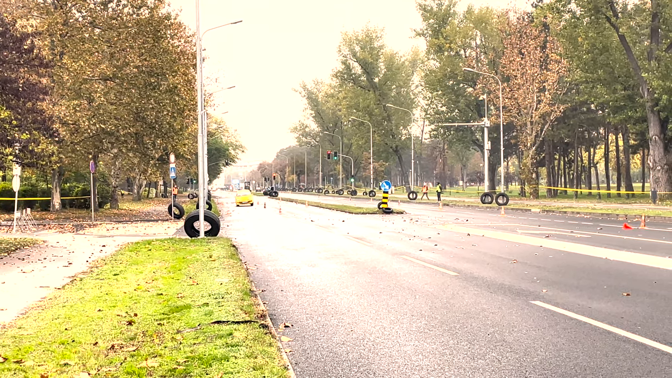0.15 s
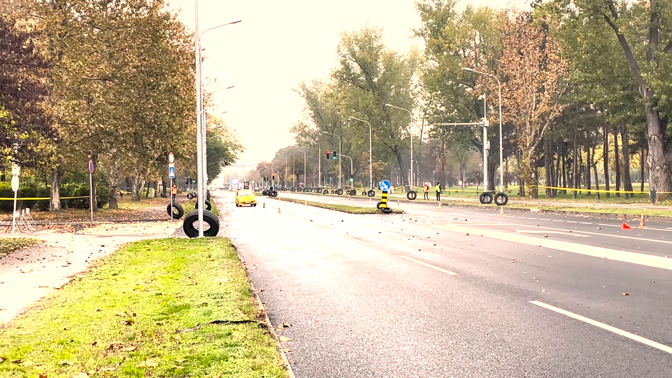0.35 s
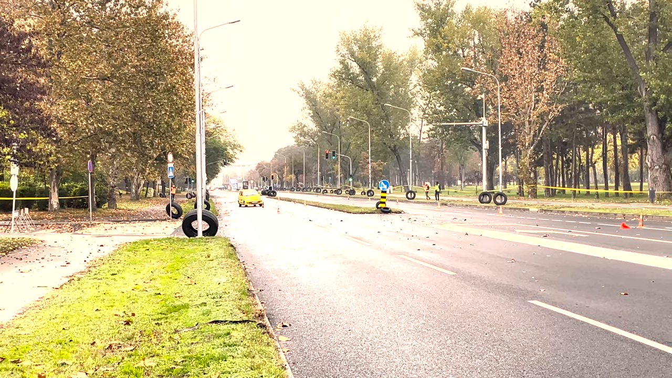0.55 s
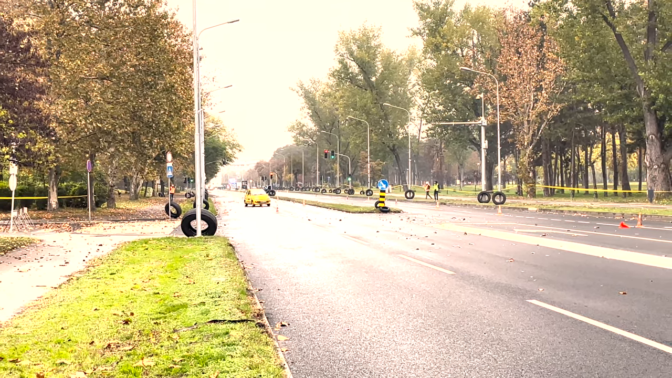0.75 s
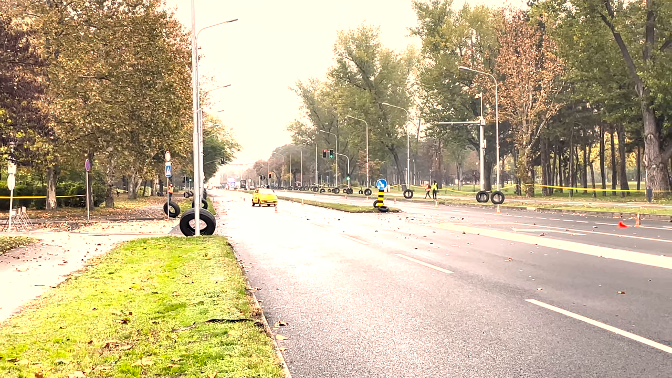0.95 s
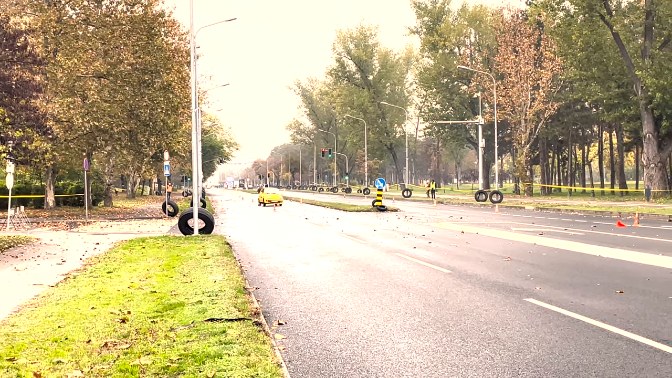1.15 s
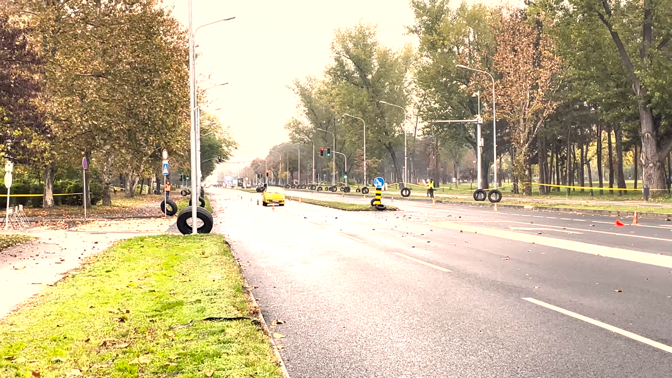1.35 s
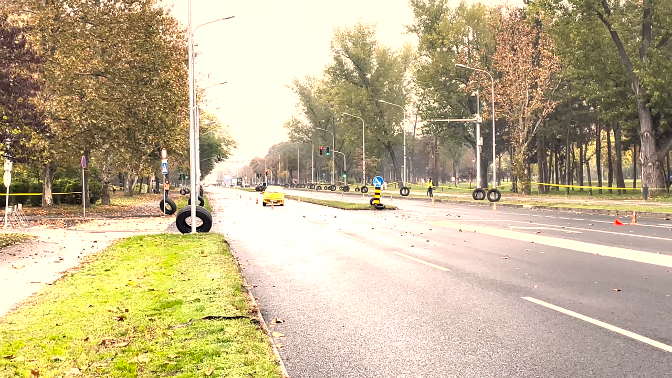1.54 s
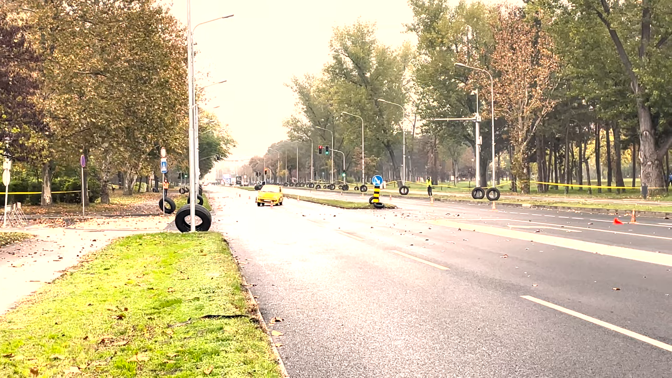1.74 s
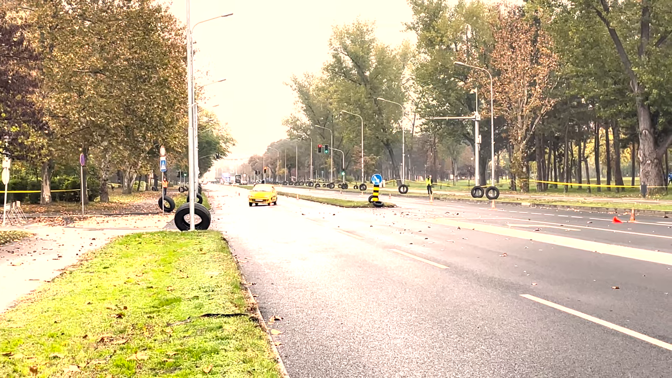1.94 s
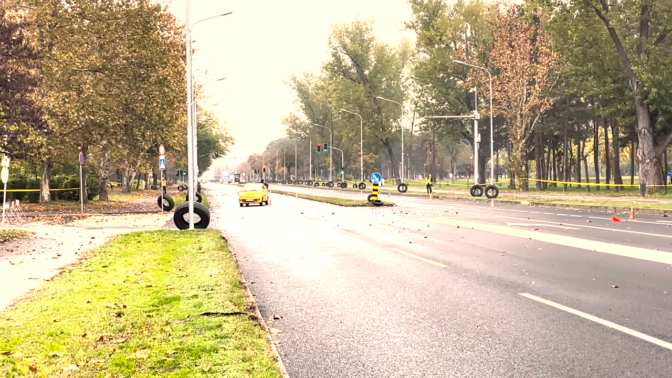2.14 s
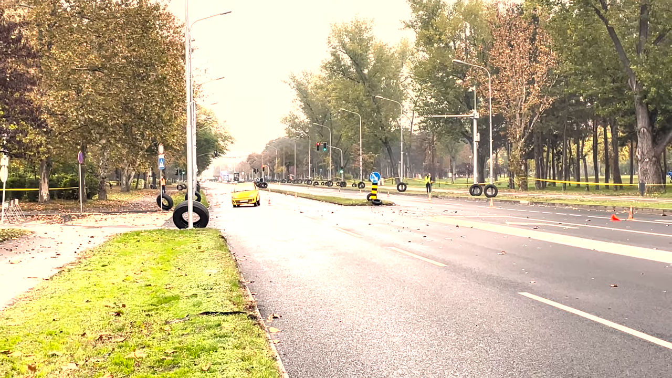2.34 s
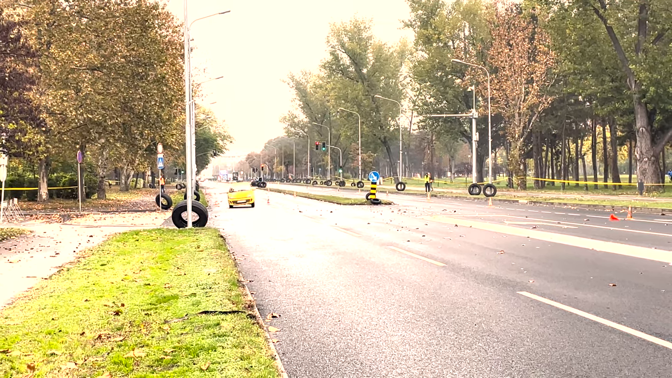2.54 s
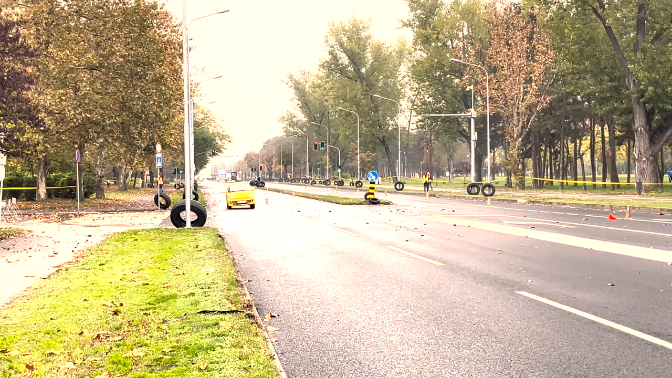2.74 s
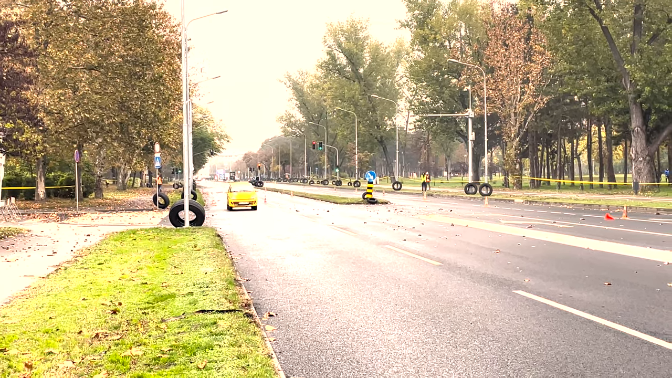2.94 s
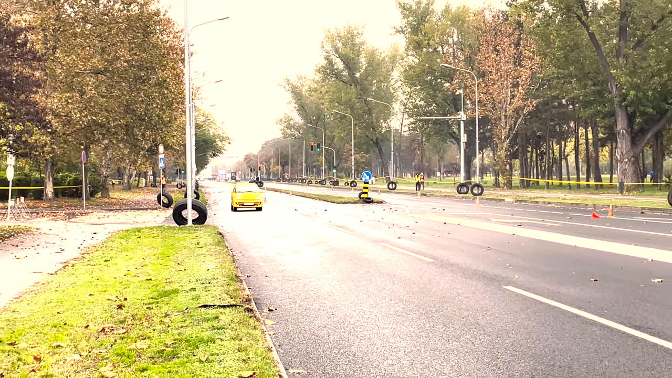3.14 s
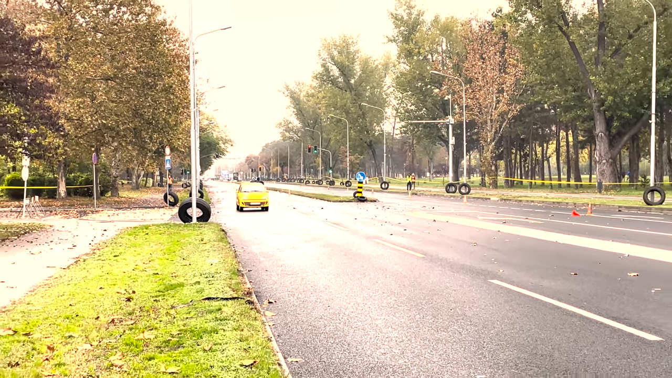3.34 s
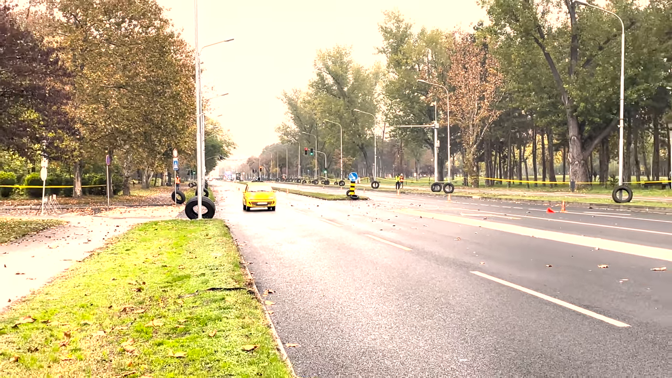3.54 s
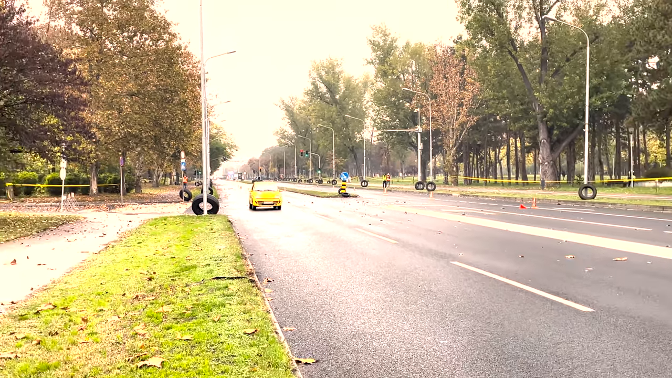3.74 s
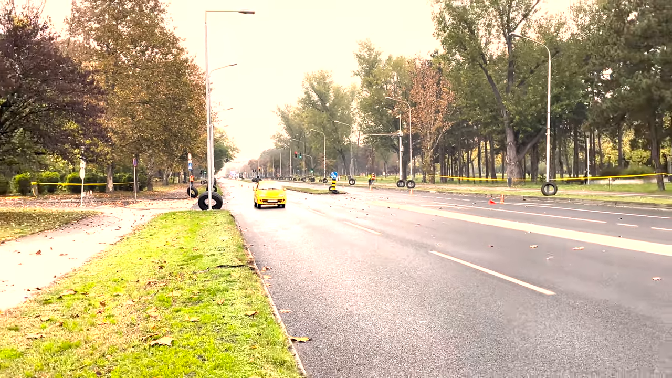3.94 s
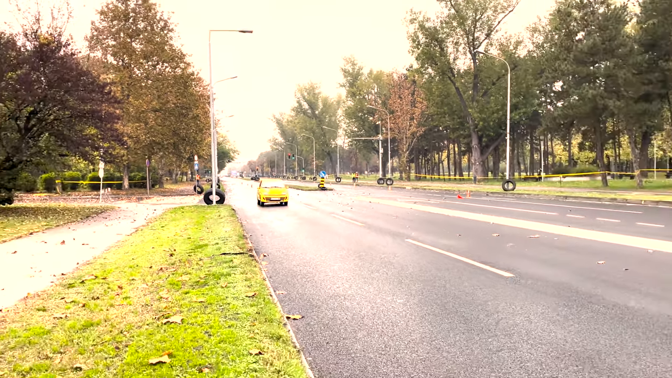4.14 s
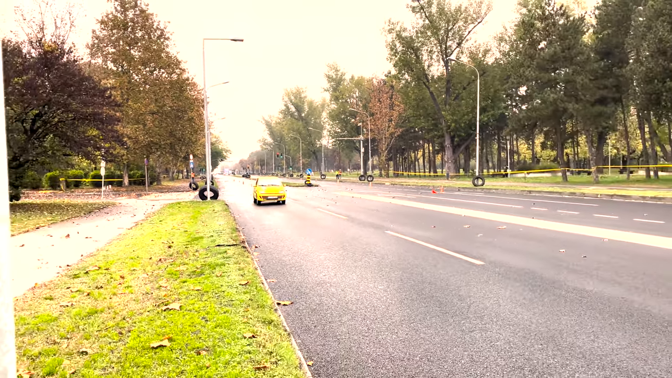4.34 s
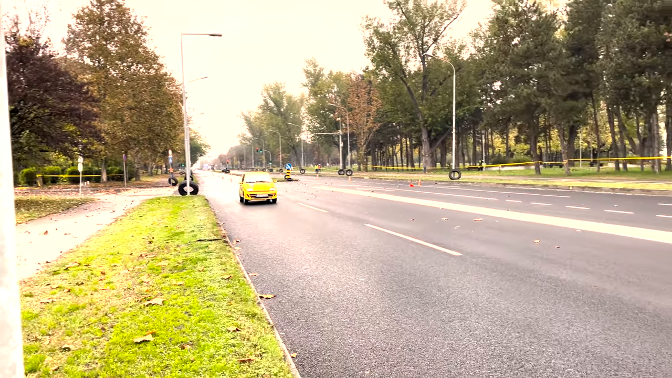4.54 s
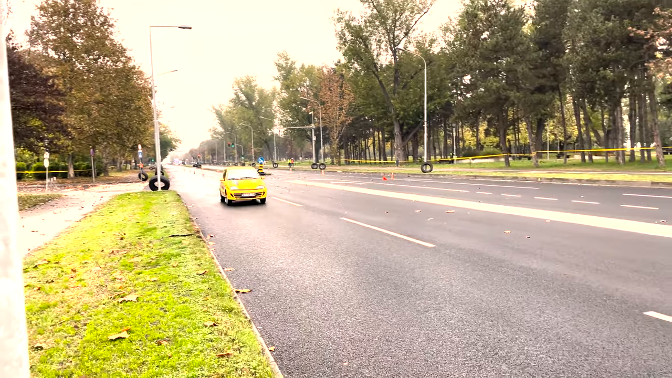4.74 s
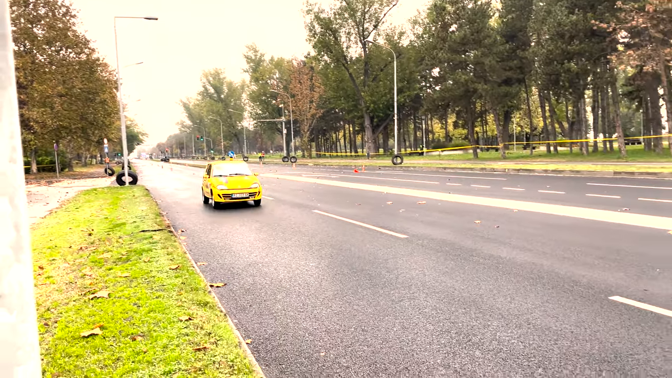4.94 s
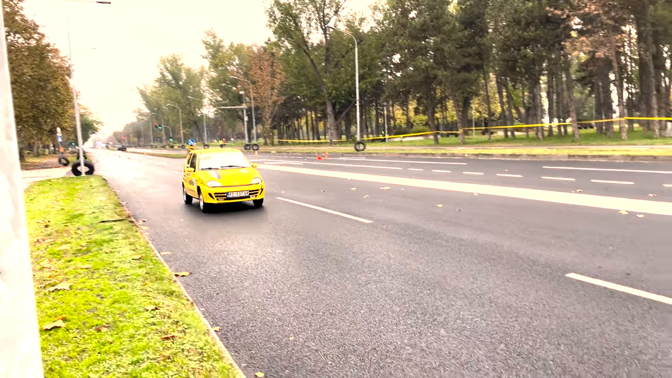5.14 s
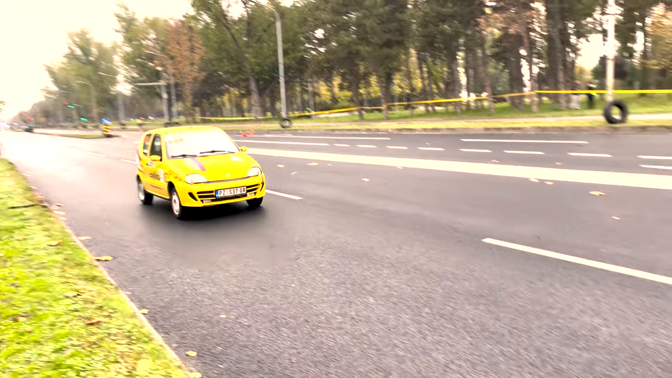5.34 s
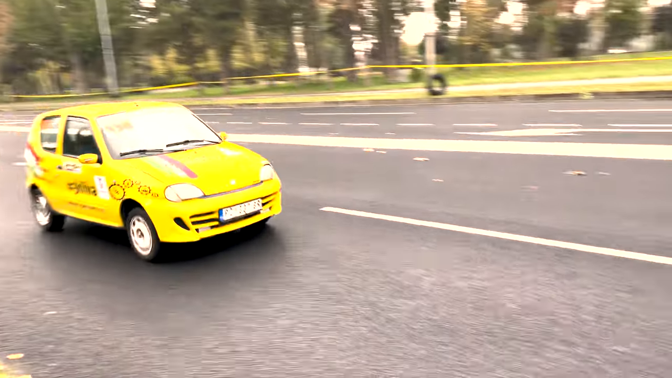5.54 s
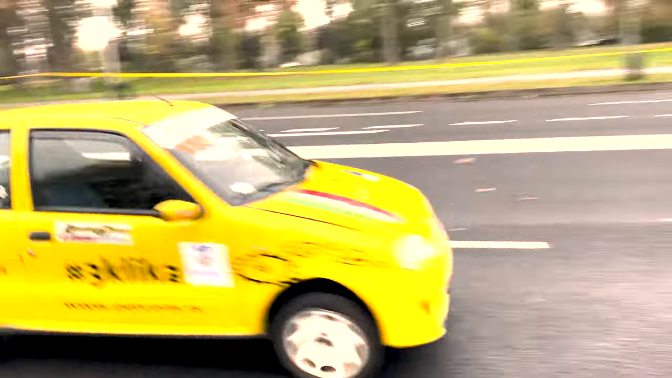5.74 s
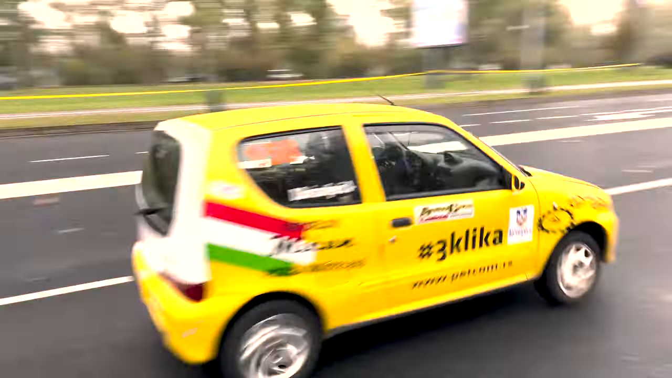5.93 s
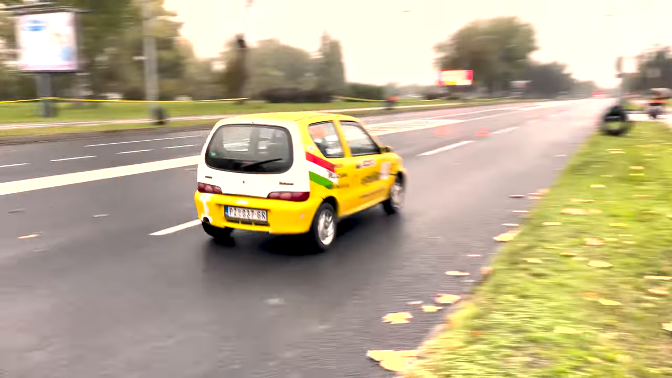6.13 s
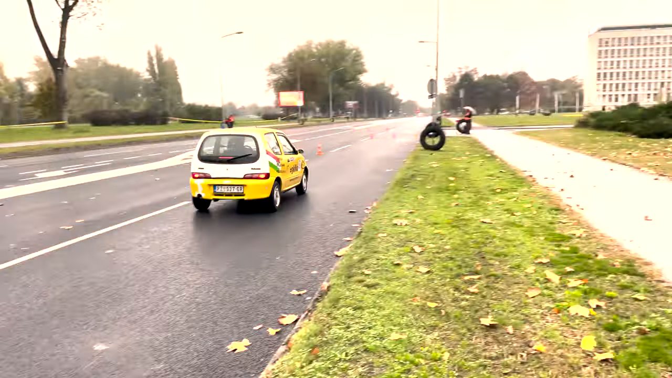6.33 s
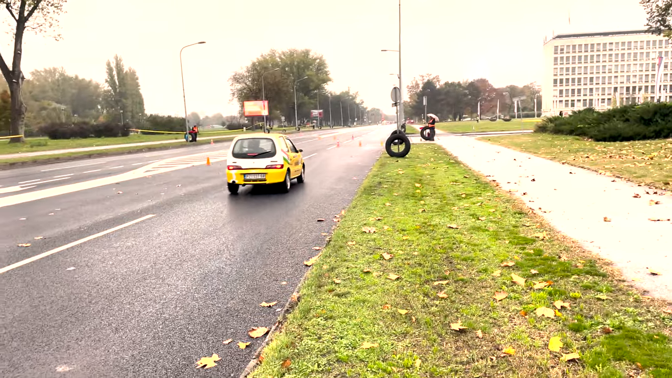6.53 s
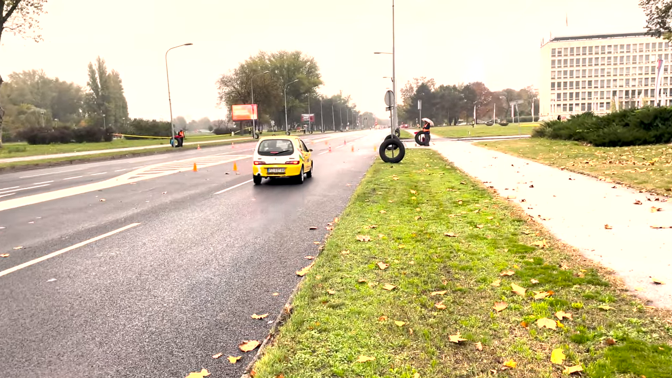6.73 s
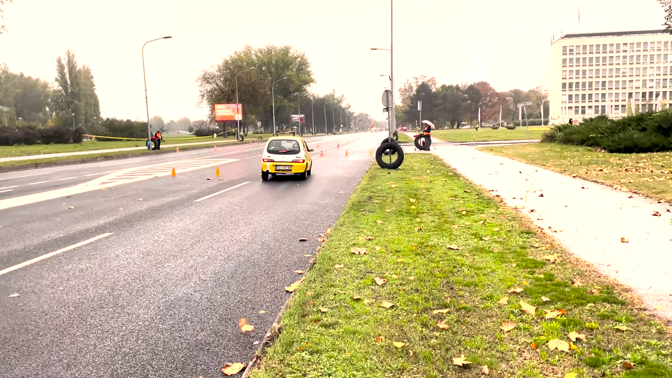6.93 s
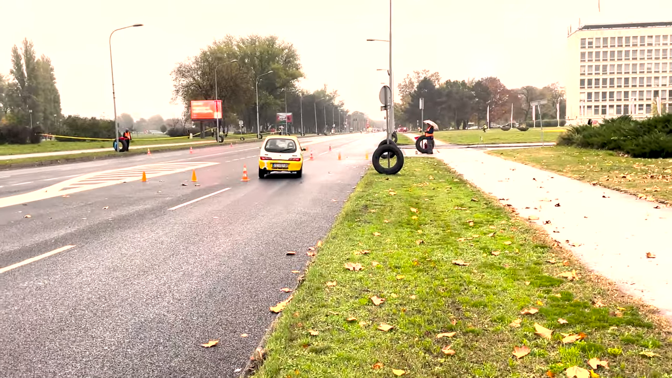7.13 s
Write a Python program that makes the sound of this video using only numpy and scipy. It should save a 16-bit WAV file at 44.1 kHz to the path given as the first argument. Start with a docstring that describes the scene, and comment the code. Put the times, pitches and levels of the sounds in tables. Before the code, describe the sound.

A roadside stereo microphone on a wet avenue, with light wind rumble and soft low bumps, strongest around 2.4 and 3 s. At 0 s a distant tyre squeal around 1.4 kHz is already sounding and breaks off within about 0.2 s. A faint small four-cylinder engine and wet road hiss continue. From 1.4 to 2 s a softer, sagging squeal near 1.1 kHz returns, and a thin drivetrain whine wanders until 3.5 s. From 2.4 s the engine revs climb steadily, buzzy and raspy, as hiss and roar swell, steeply after 5 s. At 5.7 s the car passes about four metres away: loud broadband wet rush, gritty swishes, crackling droplets. Near 6 s the throttle shuts with a soft chuff and the pitch drops; a short blip peaks around 6.2 s, another chuff follows at 6.3 s, then revs fall and fade to 7 s, with one tick at 6.5 s and faint tree reverberation.

```python
"""A wet avenue lined with trees: a small four-cylinder rally car squeals in a distant slalom, then revs up to the roadside.
It passes a few metres away in a hiss of spray, lifts off, blips the throttle once and coasts away.
The engine is a sum of crank orders with pulsed noise; road and water are modulated, filtered noise; skids are sagging tones.
Levels follow the distance and bearing of a straight drive past. Trees answer diffusely, a nearby surface adds one
short echo, the road ticks and crackles, and light wind bumps the microphone."""
import sys
import numpy as np
from scipy import signal
from scipy.fft import rfft, irfft, next_fast_len
from scipy.io import wavfile
from scipy.ndimage import map_coordinates

SR = 44100
rng = np.random.default_rng(int(sys.argv[2]) if len(sys.argv) > 2 else 0)


def wav_record(signal):
    """Record a signal, one row per channel, as 16-bit PCM in the file named by sys.argv[1]."""
    frames = np.transpose(np.atleast_2d(signal))
    bounded = np.clip(frames, -1, 1)
    # unit amplitude maps onto the largest positive 16-bit level
    quanta = np.round(bounded * 32767).astype(np.int16)
    wavfile.write(sys.argv[1], SR, quanta)


N = 316638  # samples
TIME_S = np.arange(N) / SR


def amp(db):
    """Decibel law: a level as a pressure gain."""
    return 10 ** (np.asarray(db) / 20)


def unit(x):
    """Normalisation: scale to rms 1."""
    return x / np.sqrt(np.mean(x ** 2) + 1e-20)


def along(points, hz):
    """Interpolation on a logarithmic frequency axis, for each column after the frequency."""
    knots_hz, *columns = np.transpose(points)
    return [np.interp(np.log(hz + 1), np.log(knots_hz + 1), column) for column in columns]


def curves(rows):
    """Linear interpolation in time: one value per sample for each column after the time."""
    knots_s, *columns = np.transpose(rows)
    return [np.interp(TIME_S, knots_s, column) for column in columns]


def wobble(rate):
    """Band-limited randomness: a smooth random curve of rms 1, with rate knots a second."""
    knots = rng.standard_normal(int(N * rate / SR) + 4)
    return unit(map_coordinates(knots, [np.arange(N) * rate / SR]))


def swell(s, half_length):
    """Gaussian envelope: a bell of height 1 around a moment."""
    return np.exp(-((TIME_S - s) / half_length) ** 2)


def swells(rows):
    """Superposition of envelopes: the summed gain of several (time [s], half-length [s], level [dB]) bells."""
    return sum(amp(db) * swell(s, half_length) for s, half_length, db in rows)


def step(s, length):
    """Linear transition: a ramp from 0 to 1 centred on a moment."""
    return np.clip((TIME_S - s) / length + 0.5, 0, 1)


def filtered(x, response):
    """Linear filtering: multiply the spectrum by a complex response of frequency."""
    size = next_fast_len(N + SR // 4)
    return irfft(rfft(x, size) * response(np.fft.rfftfreq(size, 1 / SR)), size)[..., :N]


def coloured(x, spectrum):
    """Spectral shaping: x filtered by a (frequency [Hz], level [dB]) curve, at rms 1."""
    return unit(filtered(x, lambda hz: amp(along(spectrum, hz)[0])))


def noise(scatter):
    """Partial coherence: white noise with a shared part and a part opposed between the ports."""
    direct, stray = rng.standard_normal((2, N))
    return np.array([direct + scatter * stray, direct - scatter * stray]) / np.sqrt(1 + scatter ** 2)


def partial(turns, unsteady, rate):
    """Modulated sinusoid: a random starting phase, with flutter in strength and phase."""
    phase = 2 * np.pi * (turns + rng.random()) + unsteady * wobble(rate)
    return np.sqrt(2) * (1 + unsteady * wobble(rate)) * np.sin(phase)


# steady wind on the microphone: (time [s], level [dB])
BREEZE_LEVEL = [(0, -41.5), (2.2, -38.5), (4.1, -38.5), (4.95, -36.5), (5.5, -45), (6.4, -42), (7.0, -48)]
# wind bumps: (start [s], peak of the envelope [dB])
WIND_BUMPS = [(0.025, -33), (0.275, -36), (0.703, -30), (0.857, -28.5), (1.029, -26), (1.409, -32),
              (2.35, -22.5), (2.529, -34), (2.609, -29), (3.039, -21.5), (3.268, -28), (3.85, -32),
              (4.899, -24.5), (5.976, -28)]
# colour of the wind rumble: (frequency [Hz], relative level [dB])
WIND_SPECTRUM = [(20, -42), (40, -14.5), (58, 1.5), (85, -8), (130, -9), (250, -16.5), (600, -25.5),
                 (2000, -56), (8000, -100)]


def wind():
    """Turbulent pressure: lumpy low rumble, stronger on the left, and gusts as short damped oscillations."""
    rumble = coloured(noise(scatter=0.55), WIND_SPECTRUM) * amp(1.8 * wobble(10))
    air = amp(curves(BREEZE_LEVEL)[0]) * rumble
    for start, db in WIND_BUMPS:
        age = np.maximum(TIME_S - start, 0)
        push = age / 0.017  # the envelope peaks after 17 ms
        bump_hz = 60 * amp(rng.normal(0, 1))
        air = air + amp(db) * push * np.exp(1 - push) * np.sin(2 * np.pi * bump_hz * age)
    return air * amp([[0.5], [-0.5]])


# decay of the avenue's answer: (frequency [Hz], time to fall 60 dB [s])
TREE_DECAY = [(150, 0.97), (1200, 0.58), (8000, 1)]


def trees(x):
    """Diffuse reverberation: convolution with decaying noise, alike in the two channels only in the bass."""
    hz, t, z = signal.stft(rng.standard_normal((2, SR)), SR, nperseg=256)
    decay = amp(-60 * t / along(TREE_DECAY, hz)[0][:, None])
    answer = np.array(signal.istft(z * decay, SR, nperseg=256)[1])
    # the norm of the middle and side responses together is scaled to 1
    answer = answer / np.linalg.norm(answer)
    mid, side = signal.fftconvolve(x.mean(axis=0)[None], answer, axes=1)[:, :N]
    side = filtered(side, lambda hz: hz / np.hypot(hz, 700))
    return np.array([mid + side, mid - side]) / np.sqrt(2)


# short ticks and splash crackles from the road:
# (time [s], level before a 12 dB cut [dB], time to fall 60 dB [s], snap against ring [dB])
ROAD_TICKS = [(0.92, -53, 0.22, -18), (3.6794, -43, 0.08, -5), (5.634, -20, 0.066, 8),
              (5.732, -22, 0.07, 10), (6.536, -20.5, 0.041, 1), (7.0209, -48, 0.1, 0)]


def ticks():
    """Impulse and exponential decay: ticks and splash crackles from the road mix a ring with a bright snap."""
    ring_spectrum = [(3000, -30), (6000, -14), (6800, 1), (8000, -12), (10000, -30), (15000, -50)]
    ring = coloured(noise(scatter=0.3), ring_spectrum)
    snap = coloured(noise(scatter=0.3), [(3000, -30), (7000, 2), (13000, -8), (15000, -12)])
    out = np.zeros((2, N))
    for start, db, t60, snap_db in ROAD_TICKS:
        envelope = amp(db - 12 - 60 * np.abs(TIME_S - start) / t60) * (TIME_S >= start)
        out += envelope * unit(ring + amp(snap_db) * snap)
    return out


# tyres sliding in the slalom: (start [s], attack [s], time until release [s], release time constant [s],
# starting pitch [Hz], level [dB], overtones [dB], scrub against tone [dB], pitch roughness [0-1])
SKID_EVENTS = [(0.0, 0.0015, 0.032, 0.004, 1374, -27, -6.5, -9, 0.07),
               (0.036, 0.0027, 0.0099, 0.0067, 1280, -33.5, -2, -7, 0.1),
               (0.061, 0.015, 0.023, 0.0095, 1425, -35.5, -5, -2, 0.12),
               (0.045, 0.01, 0.1, 0.092, 1250, -45.5, -20, -6, 0.09),
               (1.397, 0.019, 0.15, 0.047, 1158, -39.5, -11, -5.5, 0.12),
               (1.449, 0.16, 0.28, 0.055, 1100, -35, -21, -7, 0.09),
               (1.58, 0.11, 0.25, 0.094, 1030, -38, -14, -6, 0.09)]
# broad noise of sliding rubber: (frequency [Hz], relative level [dB])
SCRUB_SPECTRUM = [(500, -19), (900, -2), (1400, 2.5), (2200, -3.5), (2800, -10), (4200, -20.5), (6000, -38),
                  (12000, -71)]
SKID_SAG_HZ_PER_S = 70


def squeal():
    """Stick-slip friction: each tread sounds an unsteady, sagging pitch over the scrub of sliding rubber."""
    out = np.zeros((2, N))
    scrub = coloured(noise(scatter=0.098), SCRUB_SPECTRUM)
    chatter = unit(amp(1.2 * wobble(150) + 1.3 * wobble(50)))
    for start, attack, length, release, start_hz, db, overtone_db, scrub_db, rough in SKID_EVENTS:
        age = np.maximum(TIME_S - start, 0)
        envelope = np.minimum(age / attack, 1) * np.exp(-np.maximum(age - length, 0) / release)
        pitch_hz = start_hz - SKID_SAG_HZ_PER_S * np.minimum(age, 2 * length)
        phase = 2 * np.pi * np.cumsum(pitch_hz * (1 + rough * wobble(650))) / SR
        tone = np.sin(phase) + amp(overtone_db) * np.sin(2 * phase)
        tone += 0.5 * amp(2 * overtone_db) * np.sin(3 * phase)
        out += amp(db) * envelope * unit(unit(tone) + amp(scrub_db) * scrub)
    return out * chatter


# horn resonance of the tyres: (time [s], centre frequency [Hz])
HORN_PITCH = [(4.1, 2258), (5.45, 2370), (5.62, 2202), (5.76, 2560), (6.15, 2360), (6.42, 1838),
              (7.15, 1742)]
# the horn faces the microphone: (time [s], half-length [s], extra level [dB])
HORN_FLARE = (5.73, 0.17, 11.6)


def howl(db, scatter):
    """Horn resonance: the wedge of tread and road sounds a narrow band that shifts with the angle to the wheels."""
    centre_hz, = curves(HORN_PITCH)
    flare_s, half_length, flare_db = HORN_FLARE
    flare = swell(flare_s, half_length)
    band = coloured(noise(scatter), [(20, 2.0), (110, 6.0), (190, -23), (320, -36), (1000, -80.5)])
    # abreast, several wheels sound at once and the band widens
    width = 0.028 + 0.05 * flare
    pitch_hz = centre_hz * (1 + width * wobble(300) + 0.012 * wobble(18))
    # the low-frequency noise is moved up to the centre frequency
    horn = unit(band * np.cos(2 * np.pi * np.cumsum(pitch_hz) / SR))
    return amp(db + flare_db * flare) * horn


# swishes from the wheels as they go past and just after: (time [s], half-length [s], level [dB])
WHEEL_SWISHES = [(5.645, 0.038, -22), (5.74, 0.032, -20), (6.13, 0.044, -39)]
# colour of the swish: (frequency [Hz], relative level [dB])
SWISH_SPECTRUM = [(700, -35), (1700, -22), (2200, 1), (2800, 1.5), (3600, -5), (5200, -4), (8000, -20),
                  (13000, -16), (15000, -31)]


def wheels():
    """Modulated noise: each wheel throws a gritty swish of water as it goes by."""
    grit = amp(2.1 * wobble(1500) + 1.5 * wobble(220))
    return swells(WHEEL_SWISHES) * coloured(noise(scatter=0.8) * grit, SWISH_SPECTRUM)


# wetter stretches of road: (time [s], half-length [s], extra spray [dB], extra hiss [dB], extra roar [dB])
PUDDLE_LEVELS = [(0.38, 0.2, 11, 1.5, 2.5), (2.047, 0.18, 8, 4, 3), (2.711, 0.41, 5, 3, -1.5),
                 (3.453, 0.36, 6, 2, 0.5), (4.297, 0.73, 3, -1.5, 2.5), (4.942, 0.48, 1, 5, -1),
                 (5.59, 0.16, -2, -0.5, -3.5), (6.262, 0.08, 4.5, 5, -0.5)]


def road_levels(level):
    """Additive decibel corrections: spray, hiss and roar change with the wetness of the road."""
    even = np.array([level["spray"], level["hiss"], level["roar"]])
    return even + sum(np.outer(db, swell(s, half_length)) for s, half_length, *db in PUDDLE_LEVELS)


# spectra of the road roar, the roar close by, the wet hiss and the droplets: (frequency [Hz], relative level [dB])
ROAR_SPECTRUM = [(300, -12), (700, -3.5), (1100, -2), (1550, 1), (1950, -2.5), (2350, -3.5), (2900, -8),
                 (3700, -10.5), (5000, -36), (10000, -71)]  # also colours the engine's clatter
ROAR_CLOSE_SPECTRUM = [(450, -10), (800, -3.5), (1020, -1.5), (1230, 0), (1420, -7.5), (1700, 5),
                       (1950, -8.5), (2330, 2.5), (2620, -4), (2900, -5), (3250, -14), (3700, -9),
                       (4200, -17), (10000, -75)]
HISS_SPECTRUM = [(1500, -10.5), (2800, -2), (3500, 2.5), (4400, 1), (5100, -1.5), (5700, -5.5),
                 (7000, -4.5), (7600, -6), (8300, -7), (9100, -16.5), (9800, -49), (12000, -48)]
SPRAY_SPECTRUM = [(3000, -17.5), (5000, 7), (8300, 3), (9300, 0), (11500, 2), (13300, -6), (14500, -13),
                  (15200, -35)]


def tyres(crank_hz, spray_db, hiss_db, roar_db, scatter, aside):
    """Amplitude-modulated noise: road roar throbs with the engine, under wet hiss and flickering droplets."""
    crank = np.cumsum(crank_hz) / SR
    throb = amp(0.17 * np.cos(4 * np.pi * crank) + 0.52 * wobble(70))
    rush = noise(scatter) * throb
    # close by, the wheel arches and engine bay give the roar hollow resonances
    blend = (1 - aside) * coloured(rush, ROAR_SPECTRUM) + aside * coloured(rush, ROAR_CLOSE_SPECTRUM)
    roar = amp(roar_db) * blend
    hiss = amp(hiss_db) * coloured(noise(scatter) * amp(0.93 * wobble(400)), HISS_SPECTRUM)
    droplets = amp(0.82 * wobble(2500) + 0.96 * wobble(90))
    spray = amp(spray_db) * coloured(noise(scatter=0.11) * droplets, SPRAY_SPECTRUM)
    return roar + hiss + spray


# thin whine from the drivetrain: (time [s], pitch [Hz], level [dB])
WHINE_TRACK = [(1.45, 2143, -66), (1.62, 2205, -51), (1.78, 2174, -52), (1.99, 2240, -48.5),
               (2.11, 2164, -46), (2.2, 2090, -70), (2.35, 2130, -54), (2.6, 2220, -49), (2.87, 2305, -52),
               (2.97, 2280, -52), (3.3, 2377, -46), (3.5, 2420, -68)]


def whine():
    """Tonal radiation: a faint, slightly rough drivetrain tone of wandering pitch, while the car is far off."""
    pitch_hz, db = curves(WHINE_TRACK)
    return amp(db) * partial(np.cumsum(pitch_hz) / SR, unsteady=0.35, rate=120)


# overtones of the bark: (multiple of the crank rate, relative level [dB])
BARK_ORDERS = [(1, -9), (2.5, -10), (3.5, -6.5), (4, -4), (4.5, -11), (5, -13), (5.5, -9), (6, 1),
               (6.5, -9), (7, -4), (7.5, -4), (8, -3), (8.5, -7), (9, -6), (10, -6), (11, -8), (12, -19),
               (14, -14), (16, -9), (17, 1), (18, -4), (19, -10), (20, -11), (24, -10), (26, -5)]
# resonances of the exhaust pipe: (frequency [Hz], gain [dB])
PIPE_RESONANCES = [(100, 4.5), (380, -2.5), (470, -10), (600, -1), (690, -3), (800, 2.5), (975, 3),
                   (1110, -15), (1350, -12), (1520, 5), (1750, -14)]
# overtones that stand out for a while: (time [s], half-length [s], multiple of the crank rate, extra level [dB])
ORDER_FLARES = [(2.0, 0.17, 10, 8.5), (2.6, 0.35, 10, 6.5), (3.3, 0.28, 9, 10.5), (3.65, 0.22, 8, 10),
                (4.3, 0.51, 10, 3.5), (2.2, 0.3, 17, 6), (3.3, 0.46, 11, 6), (4.6, 0.6, 4, 8),
                (5.0, 0.99, 6, 7), (5.1, 1, 8, 7.5), (5.34, 0.52, 9, 13.5), (5.25, 0.6, 5.5, 11),
                (5.58, 0.17, 7, 9.5), (5.4, 0.4, 11, 13), (6.0, 0.054, 4, 11.5), (6.25, 0.05, 4, 7),
                (6.21, 0.26, 10, 14), (6.27, 0.16, 6, 6), (6.97, 0.4, 10, 5)]
FLICKER_DB, FLICKER_PER_S = 1.8, 7  # rms depth away from a flare; random knots a second


def overtones(crank, crank_hz):
    """Pipe resonance: each exhaust overtone swells as it climbs through a peak, and flickers."""
    out = np.zeros(N)
    for order, db in BARK_ORDERS:
        flare_db = sum(extra_db * swell(s, half_length)
                       for s, half_length, which, extra_db in ORDER_FLARES if which == order)
        gain_db = db + along(PIPE_RESONANCES, order * crank_hz)[0] + flare_db
        # an overtone that stands out holds steadier
        flicker_db = FLICKER_DB * wobble(FLICKER_PER_S) / amp(flare_db)
        out += amp(gain_db + flicker_db) * partial(order * crank, unsteady=0.18, rate=20)
    return unit(out)


# changes of throttle, at which firing tone, third order and bark rise or fall:
# (start [s], end [s], change of firing tone [dB], of third order [dB], of bark [dB])
THROTTLE_CHANGES = [(-0.2, 1.015, -1.5, 3, -3), (2.092, 2.31, 2, -3.5, 0), (5.972, 6.042, -17, 0, 0),
                    (6.284, 7.4, -7, 2.5, 2.5)]
# one brief swell of the firing tone on the run-up: (time [s], half-length [s], extra level [dB])
FIRING_SWELL = (5.2, 0.053, 3.5)
# brief fades and swells of the engine's tones:
# (time [s], half-length [s], change of firing tone [dB], of third order [dB], of bark [dB])
TONE_FADES = [(2.0, 1, 3.5, -1.5, 2), (5.504, 0.074, -2.5, -4.5, 1), (5.667, 0.057, -10.5, -2.5, -4.5),
              (5.87, 0.033, -2, 4, -0.5), (6.34, 0.015, -23, -5, -6), (6.398, 0.21, 2, -10.5, -1),
              (6.84, 0.11, -11, 1.5, 0.5)]
THROTTLE_S = 0.02  # time a change of throttle takes
THIRD_DB_PER_OCTAVE, FULL_CRANK_HZ = 6, 98.7  # growth of the third order; crank rate at which it is unchanged


def exhaust_levels(level, crank_hz):
    """Load dependence: firing tone, third order and bark in dB rise or fall with changes of throttle."""
    swell_s, swell_length, swell_db = FIRING_SWELL
    full = np.array([level["firing"] + swell_db * swell(swell_s, swell_length),
                     level["third"] + THIRD_DB_PER_OCTAVE * np.log2(crank_hz / FULL_CRANK_HZ),
                     level["bark"]])
    changes = sum(np.outer(db, step(start, THROTTLE_S) - step(end, THROTTLE_S))
                  for start, end, *db in THROTTLE_CHANGES)
    return full + changes + sum(np.outer(db, swell(s, half_length)) for s, half_length, *db in TONE_FADES)


# spectra of the exhaust rasp and the intake growl: (frequency [Hz], relative level [dB])
RASP_SPECTRUM = [(100, -2.5), (250, 5.5), (440, -14), (600, -4.5), (820, -9.5), (1050, -20), (1500, -24),
                 (3000, -53), (8000, -92)]
GROWL_SPECTRUM = [(250, -26), (430, -22), (560, -8), (710, 1), (790, -1.5), (880, 1), (1020, -10),
                  (1400, -28), (3000, -64)]
# exhaust chuffs as the throttle shuts: (time [s], half-length [s], level [dB])
EXHAUST_CHUFFS = [(6.0, 0.034, -32), (6.31, 0.049, -35)]
CLATTER_DB = -4.5  # against the road roar before puddles


def engine(crank_hz, firing_db, third_db, bark_db, roar_db, growl_db, scatter):
    """Periodic combustion: two firings a turn; unequal cylinders add odd and half orders; gas and valves add noise."""
    crank = np.cumsum(crank_hz) / SR
    boom = amp(firing_db) * partial(2 * crank, unsteady=0.12, rate=30)
    boom += amp(third_db) * partial(3 * crank, unsteady=0.062, rate=30)
    puffs = amp(2 * np.cos(4 * np.pi * crank) + 0.42 * np.cos(np.pi * crank))
    rasp = coloured(noise(scatter) * puffs, RASP_SPECTRUM)
    snarl = unit(overtones(crank, crank_hz) + 0.58 * rasp)
    gulps = amp(5 * np.cos(4 * np.pi * crank) + 2 * np.cos(2 * np.pi * crank))
    growl = amp(growl_db) * coloured(noise(scatter) * gulps, GROWL_SPECTRUM)
    # the same ragged clatter returns every two turns, which makes a comb of half orders
    cycle = rng.standard_normal(size=256)
    rattle = map_coordinates(cycle, [crank / 2 % 1 * len(cycle)], mode="grid-wrap")
    clatter = amp(roar_db + CLATTER_DB) * coloured(gulps * rattle, ROAR_SPECTRUM)
    chuff_spectrum = [(20, -60), (38, -22), (80, 10), (150, 1), (360, 3.0), (520, -20), (900, -32), (3000, -62)]
    chuffs = swells(EXHAUST_CHUFFS) * coloured(noise(scatter), chuff_spectrum)
    return boom + amp(bark_db) * snarl + growl + clatter + chuffs + whine()


# how each sound carries: name: (level abreast [dB], loss per doubling of distance [dB],
# extra towards the front [dB], loss per metre [dB/m])
SOUND_CARRY = {"firing": (-22, 4.5, 1, 0.15), "third": (-27, 5.0, 3.5, 0.04), "bark": (-26, 6, 3.5, 0),
               "growl": (-27.5, 6, 5, 0.9), "roar": (-20.5, 5.5, 4.5, 0.15), "hiss": (-22.5, 10, 4.5, 0.09),
               "spray": (-26.5, 11.5, 4, 0.18), "howl": (-33, 2.5, 5.5, -0.14)}
PASS_S, GAP_M, SPEED_M_PER_S = 5.704, 4.19, 14.35  # closest approach, its distance, speed


def drive():
    """Spreading, absorption and directivity: closeness (1 abreast), bearing (0 ahead, 180 behind), levels in dB."""
    ahead_m = SPEED_M_PER_S * (PASS_S - TIME_S)
    distance_m = np.hypot(ahead_m, GAP_M)
    level = {}
    for name, (db, doubling, front, per_m) in SOUND_CARRY.items():
        spreading_db = doubling * np.log2(distance_m / GAP_M)
        level[name] = db - spreading_db + front * ahead_m / distance_m - per_m * (distance_m - GAP_M)
    return GAP_M / distance_m, np.degrees(np.arctan2(GAP_M, ahead_m)), level


def echo(x, delay_ms, strength):
    """Comb-filter interference: one close reflection colours the midrange, and its comb slides with the delay."""
    at = np.arange(N) - delay_ms * SR / 1000
    surface = [(300, -20), (1200, 0), (3800, 0), (5500, -7), (10000, -20)]
    bounce = filtered(x, lambda hz: amp(along(surface, hz)[0]))
    delayed = np.array([map_coordinates(side, [at]) for side in bounce])
    return (x + strength * delayed) / np.sqrt(1 + strength ** 2)


BAND_WIDTH_HZ = 157  # half-width of each peak or hollow


def resonant(x, bands):
    """Resonance and cancellation: narrow peaks and hollows at (frequency [Hz], gain [dB])."""
    def response(hz):
        return amp(sum(db * np.exp(-((hz - centre) / BAND_WIDTH_HZ) ** 2) for centre, db in bands))
    return filtered(x, response)


# peaks and hollows of the car's noise towards each of its sides: (frequency [Hz], gain [dB])
NOSE_COLOUR = [(1950, 0.5), (2320, -1.5), (2620, -3.5), (3250, -3), (3700, 2.5), (4300, 2), (6220, 4.5),
               (6520, -5), (6850, 0.5)]
WHEEL_ARCH_COLOUR = [(1200, 0.5), (1650, -2.5), (2000, 1), (2330, -1.5), (2650, 2.5), (3200, 2.5),
                     (3580, -6)]
FLANK_COLOUR = [(1680, -1), (2300, 1), (2550, 0.5), (2950, 2.5), (3550, -1.5), (4250, 0), (6600, -6)]
TAIL_COLOUR = [(1000, -5.5), (1220, 5), (1480, -3), (2250, -2.5), (2500, 1.5), (2880, -4.5), (3270, 4),
               (3600, -5), (3950, 4), (4700, 5.5), (6400, -3), (6750, 1)]
VIEW_BLEND_DEG = 7.4  # bearing span over which one side gives way to the next


def facing(x, bearing_deg):
    """Source directivity: the body colours its noise differently towards each side as the car goes by."""
    out = resonant(x, NOSE_COLOUR)
    # bearings [degrees] at which wheel arch, flank and tail come into view
    for from_deg, bands in [(42, WHEEL_ARCH_COLOUR), (75, FLANK_COLOUR), (152.3, TAIL_COLOUR)]:
        share = np.clip((bearing_deg - from_deg) / VIEW_BLEND_DEG + 0.5, 0, 1)
        out = (1 - share) * out + share * resonant(x, bands)
    return out


def ports(x, image):
    """Interchannel phase and level: the differences between the two microphone ports for one direction."""
    def response(hz):
        lag, tilt_db = along(image, hz)
        pair = np.array([amp(tilt_db / 2), amp(-tilt_db / 2) * np.exp(-1j * lag)])
        return pair / np.sqrt(np.mean(np.abs(pair) ** 2, axis=0))
    return filtered(x, response)


# crank speed in the slalom, on the run-up and after lifting off: lists of (time [s], turns per second as heard [Hz])
CRANK_SPEED = [
    [(0.85, 62.0), (1.07, 63.6), (1.284, 69.2), (1.582, 69.4), (1.714, 76.1), (2.034, 78.1), (2.226, 71.5),
     (2.38, 75.3)],
    [(2.42, 76.3), (2.89, 80.1), (2.96, 79.7), (4.17, 92.5), (4.82, 98.8), (5.45, 103.8), (5.62, 104.3),
     (5.78, 102.8), (5.92, 98.8)],
    [(5.96, 96.8), (6.04, 90.8), (6.186, 96.4), (6.262, 93.8), (6.332, 88.8), (6.836, 78.9), (7.156, 77.0),
     (7.18, 77.3)],
]
# right port against left, for sound from ahead and from the side:
# (frequency [Hz], phase lag [radians], left minus right level [dB])
AHEAD_IMAGE = [(200, 0.53, 2.5), (2000, -1.5, -1), (3000, 0.75, 0.5), (5000, 0.68, -0.5), (5800, -1.2, 0.5),
               (6950, -1.5, 0.5), (9600, -4, 0), (9940, 10, 3), (11750, -5.5, -3), (12200, -2 * np.pi, 1)]
ASIDE_IMAGE = [(196, 0.15, 3), (686, 0.38, 6), (1330, 1.43, 3.5), (2280, 1.35, -2), (3420, 2.17, 4),
               (5130, 2.34, -2.5), (6290, 5.14, 2), (6740, 4.26, 9), (8530, 4.4, 4), (9900, 2.2, 1),
               (10100, 4, -1), (13400, 6.15, -0.5)]
# the microphone's own colour for sound from the side: (frequency [Hz], gain [dB])
SIDELONG_COLOUR = [(5000, 1), (5280, 3.5), (5620, -12), (6000, 1.5), (7330, -9.5), (7680, -6)]
# the echo's delay shrinks as the car goes by: (time [s], half-length [s], reduction [ms])
DELAY_DIP = (5.9, 0.35, 0.84)
ECHO_AHEAD_MS, ECHO_BEHIND_MS = 1.37, 1.195  # delays before the dip is subtracted
ECHO_STRENGTH = 0.33  # upper limit of the reflected share
TURN_S, TURN_LENGTH_S, TURN_SHARE = 3.9, 0.51, 0.89  # the microphone turns, leaving the car off to one side
SCATTER_FAR, SCATTER_NEAR = 0.024, 0.57  # a near car is a wide source, less alike at the two ports
TREES_DB, SKID_TREES_DB = -18, -13  # each against the sound that drives it


def scene():
    """Superposition: the car, first far ahead and then off to one side, with its reflections, in the wind."""
    crank_hz, = curves(np.vstack(CRANK_SPEED))
    closeness, bearing_deg, level = drive()
    aside = TURN_SHARE * step(TURN_S, TURN_LENGTH_S)
    scatter = SCATTER_FAR + (SCATTER_NEAR - SCATTER_FAR) * closeness

    exhaust_db = exhaust_levels(level, crank_hz)
    motor = engine(crank_hz, *exhaust_db, level["roar"], level["growl"], scatter)
    road = tyres(crank_hz, *road_levels(level), scatter, aside) + wheels()

    dip_s, dip_length, dip_ms = DELAY_DIP
    delay_ms = ECHO_AHEAD_MS + (ECHO_BEHIND_MS - ECHO_AHEAD_MS) * step(dip_s, dip_length)
    delay_ms = delay_ms - dip_ms * swell(dip_s, dip_length)
    # the reflection fades while the car is abreast
    strength = ECHO_STRENGTH * aside * (1 - closeness ** 2)
    car = echo(motor + road, delay_ms, strength) + aside * howl(level["howl"], scatter)

    skids = squeal()
    near = resonant(facing(aside * car, bearing_deg), SIDELONG_COLOUR)
    direct = ports((1 - aside) * car + skids + ticks(), AHEAD_IMAGE) + ports(near, ASIDE_IMAGE)
    return direct + trees(amp(TREES_DB) * car + amp(SKID_TREES_DB) * skids) + wind()


def record(dry):
    """Band limitation: nothing is kept from 15.1 kHz upwards."""
    return filtered(dry, lambda hz: hz < 15100)


dry = scene()
out = record(dry)
wav_record(out)
```